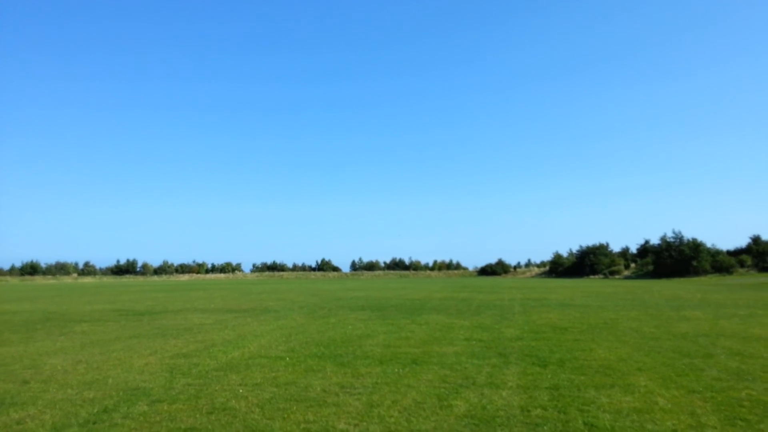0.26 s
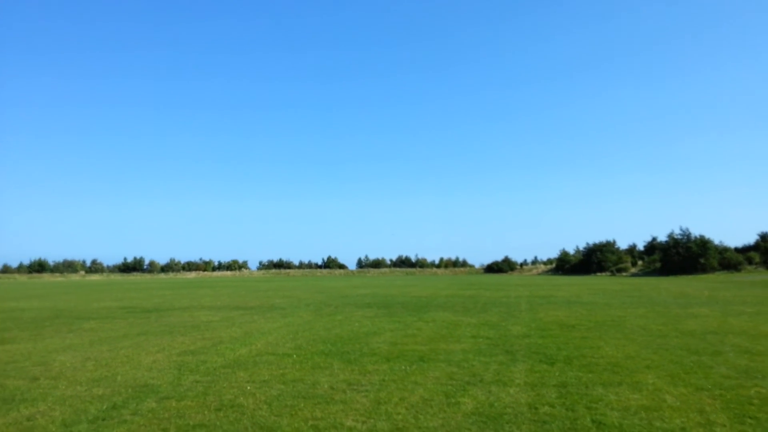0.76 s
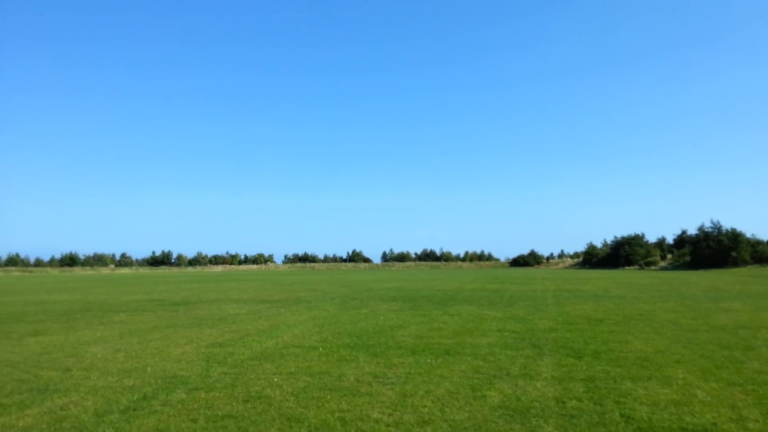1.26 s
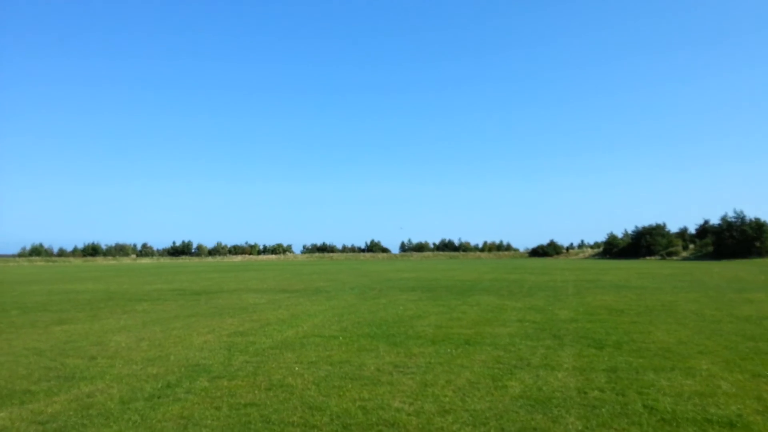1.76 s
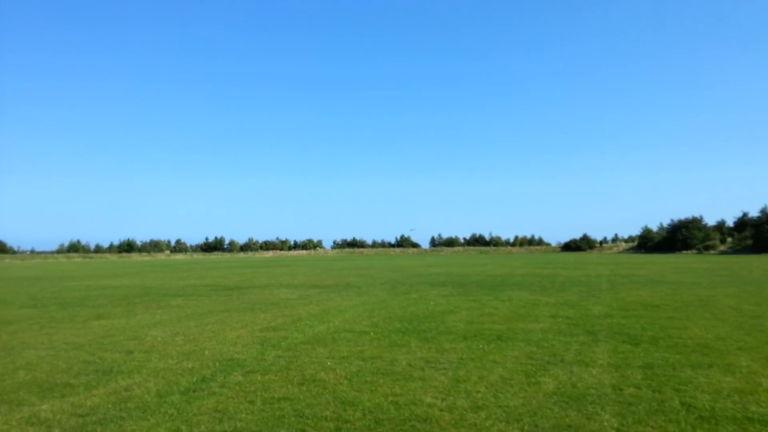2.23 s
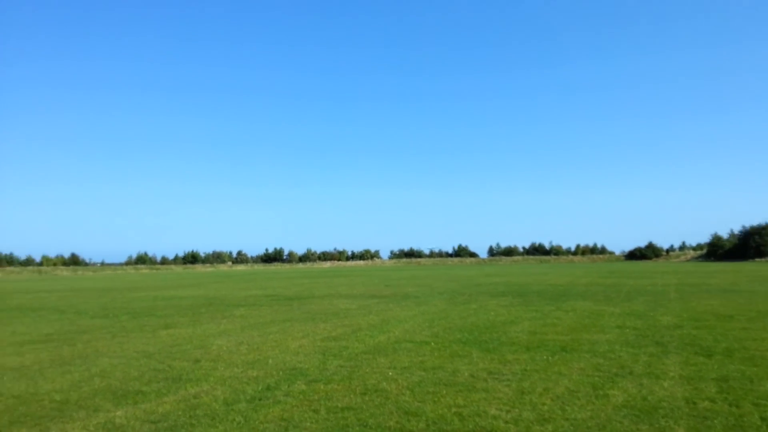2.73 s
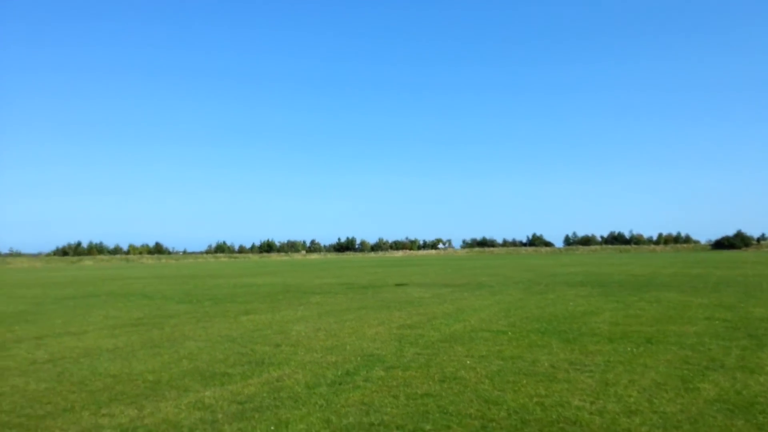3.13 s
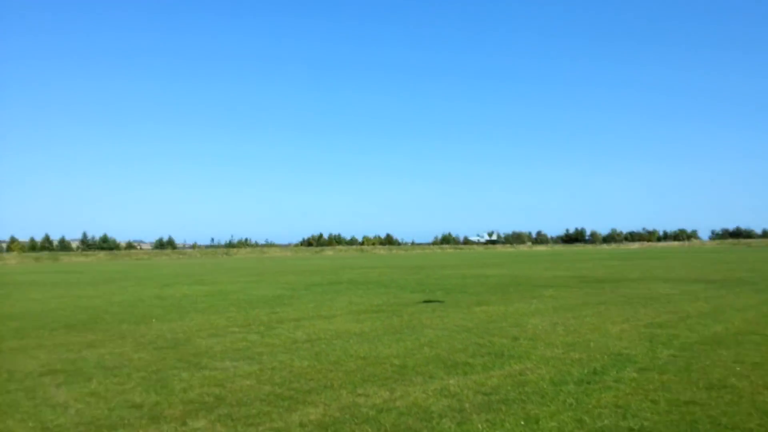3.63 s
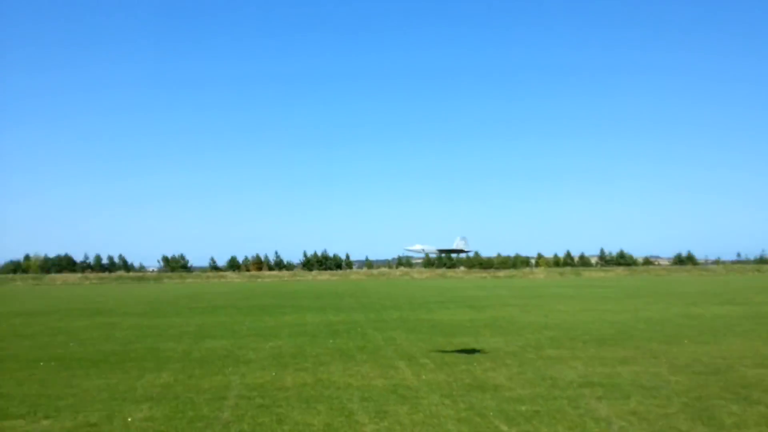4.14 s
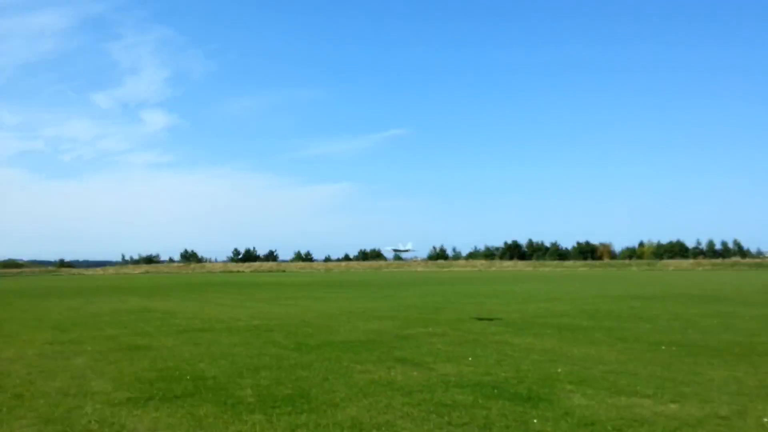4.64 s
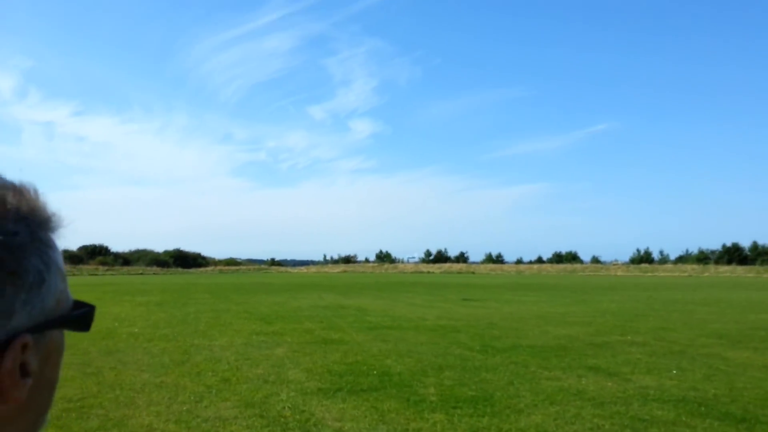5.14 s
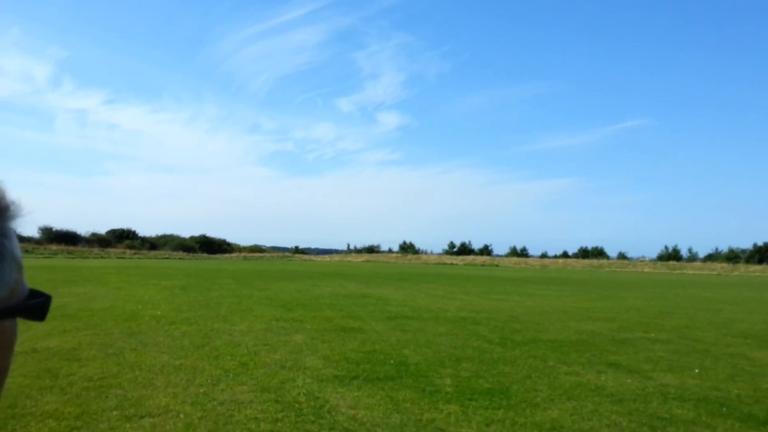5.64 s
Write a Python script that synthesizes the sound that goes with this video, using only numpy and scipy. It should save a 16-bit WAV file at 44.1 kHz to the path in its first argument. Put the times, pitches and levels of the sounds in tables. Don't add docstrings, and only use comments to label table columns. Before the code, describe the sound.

Wind buffets a small recorder as a model jet approaches with a shrill whine, sweeps close with a hissing roar, then recedes.

```python
import sys
import numpy as np
from scipy import signal
from scipy.fft import rfft, irfft, next_fast_len
from scipy.io import wavfile
from scipy.ndimage import uniform_filter1d

SR = 44100
rng = np.random.default_rng(int(sys.argv[2]) if len(sys.argv) > 2 else 0)


def invert_db(x):
    u = np.asarray(x, float) / 20
    return 10 ** u


def generate_wav(sig):
    pcm = np.round(np.clip(np.atleast_2d(sig).T, -1, 1) * 32767).astype(np.int16)
    wavfile.write(sys.argv[1], SR, pcm)


N = 259616

# (t/s, height/m, lead of the left port/us)
FLIGHT_PATH = [(0, 6.84, 17), (1.66, 4.32, 36), (2.2, 2.82, 29), (2.8, 2.27, 36), (3.2, 1.69, 35.5),
               (3.55, 1.6, 77.5), (3.93, 2.56, 114.5), (4.28, 3.36, 60), (4.6, 2.58, 30.5), (4.8, 2.36, 46),
               (5.0, 2.36, 53), (5.63, 2.19, -6), (5.89, 2.5, -29)]
SPEED_M_S, CLOSEST_M, CLOSEST_S, SOUND_M_S = 27.75, 17.5, 4.433, 343
BASS_CUT_HZ = 152


def evened(x):
    return x / np.sqrt(np.mean(x ** 2) + 1e-20)


def read(points, hz):
    f, value = np.transpose(points)
    return np.interp(np.log(hz + 1), np.log(f + 1), value)


def curves(rows, t):
    s, *columns = np.transpose(rows)
    return [np.interp(t, s, c) for c in columns]


def bumps(rows, t, half_s):
    s, *heights = np.transpose(rows)
    bells = np.exp(-.5 * ((t - s[:, None]) / half_s) ** 2)
    return np.array(heights) @ bells


def wander(shape, *spans):
    x = rng.standard_normal(shape)
    for axis, span in enumerate(spans):
        size = max(round(span), 1)
        for _ in range(2):
            x = uniform_filter1d(x, size, axis=axis)
    return evened(x)


def coloured(x, points):
    size = next_fast_len(x.shape[-1])
    gain = invert_db(read(points, np.fft.rfftfreq(size, 1 / SR)))
    return irfft(rfft(x, size) * evened(gain), size)[..., :x.shape[-1]]


def field():
    # (f/Hz, level/dB)
    floor_colour = [(25, -28), (60, -47), (120, -29), (300, -6), (900, -6), (2000, -13.5), (5000, -15),
                    (9000, -25), (15000, -22)]
    floor_db = -52
    noise = rng.standard_normal((3, N))
    return invert_db(floor_db) * coloured(noise[:2] + 0.38 * noise[2], floor_colour)


def eddies(gusts, slaps):
    gap_s, spread_db, gust_edge_s = .018, 3, 0.0087
    pop_hz, pop_hz_per_db, pop_spread = 498, 11.5, 0.12
    place, size, pitch = rng.standard_normal((int(N / SR / gap_s), 3)).T
    s = (np.arange(len(place)) + .5 + .3 * place) * gap_s
    s = np.clip(s, 0, N / SR - .01)
    start, length, usual_db = np.transpose(gusts)[:, :, None]
    outside = np.maximum(np.maximum(start - s, s - start - length), 0) / gust_edge_s
    db = (usual_db - 10 * outside).max(0) + spread_db * size
    slap_s, slap_db = np.transpose(slaps)
    s, db = np.r_[s, slap_s], np.r_[db, slap_db]
    pitch = np.r_[pitch, np.zeros(len(slaps))]
    hz = pop_hz + pop_hz_per_db * (np.maximum(db, -45) + 22)
    return np.transpose([s, db, hz * np.exp(pop_spread * pitch)])


def wind(pops, rustle_s):
    # (f/Hz, level/dB)
    rustle_colour = [(60, -93), (150, -21), (280, 1.5), (450, 3), (650, -4), (900, -12.5), (1400, -24.5),
                     (2500, -50)]
    pad = 2000
    t = np.arange(-pad, pad) / SR
    thumps, rustle_power = np.zeros((2, N + 2 * pad))
    for (s, db, hz), (turn, length) in zip(pops, rng.random((len(pops), 2))):
        shape = np.exp(-.5 * (t * hz / (.27 + .2 * length)) ** 2)
        part = slice(round(s * SR), round(s * SR) + 2 * pad)
        thumps[part] += invert_db(db - 3.35) * shape * np.cos(2 * np.pi * (hz * t + turn))
        rustle_shape = np.exp(-.5 * ((t + 0.0016) / rustle_s) ** 2)
        rustle_power[part] += invert_db(0.82 * db - 19.0) ** 2 * rustle_shape
    lumps = invert_db(4 * wander(len(thumps), 90))
    noise = rng.standard_normal(len(thumps))
    rustle = coloured(noise * np.sqrt(rustle_power) * lumps, rustle_colour)
    wind_filter = signal.butter(4, BASS_CUT_HZ, "high", fs=SR, output="sos")
    return signal.sosfilt(wind_filter, thumps + rustle)[pad:N + pad]


def flight(t):
    # (t/s, f/Hz)
    throttle = [(0, 3330), (.456, 3048), (1.856, 3251), (2.426, 3455), (2.528, 3604), (3.102, 3990),
                (3.65, 4155), (3.885, 4392), (4.13, 4345), (4.285, 4450), (4.405, 4585), (4.522, 4880),
                (4.831, 5194), (4.998, 5343), (5.101, 5576)]
    spool_s = .035
    along = SPEED_M_S * (t - CLOSEST_S)
    metres = np.hypot(along, CLOSEST_M)
    behind = along / metres
    s, settled_hz = np.transpose(throttle)
    u = np.maximum(t[:, None] - s[1:], 0) / spool_s
    fan_hz = settled_hz[0] + (1 - (1 + u) * np.exp(-u)) @ np.diff(settled_hz)
    heard_hz = fan_hz / (1 + SPEED_M_S / SOUND_M_S * behind)
    return metres, behind, fan_hz, heard_hz


def roar_levels(t):
    # (level at closest/dB, per throttle octave/dB, air loss per 100 m/dB, broadside dip/dB)
    layer_laws = [
        (-30, 7, -6.1, -1.5),
        (-38, 9.5, -3.8, 2.5),
        (-29, 3.5, -9.5, -20),
        (-37.5, 2.5, -10.5, -2),
    ]
    # (t/s, half length/s, duct level/dB, treble level/dB)
    swells = [(0.864, 0.23, 7, 5.5), (1.666, 0.073, 3, 4.5), (2.05, 0.22, -1.5, -4), (2.598, 0.13, -1, 1),
              (3.06, 0.088, -1, 5), (3.674, 0.13, 4, -1.5), (3.896, .08, -1, 4), (4.09, 0.066, 4.5, 1),
              (4.627, 0.091, -2.5, 2), (4.787, 0.16, -4, -0.5), (5.223, 0.11, 1, -1), (5.598, 0.05, 2, -5),
              (5.88, 0.11, -1, -5.5)]
    broadside, broadside_width = -0.069, 0.36
    cruise_hz = 4600
    metres, behind, fan_hz, _ = flight(t)
    side = np.exp(-.5 * ((behind - broadside) / broadside_width) ** 2)
    causes = [np.ones_like(t), np.log2(fan_hz / cruise_hz), (metres - CLOSEST_M) / 100, side]
    s, half_s, *heights = np.transpose(swells)
    duct_db, treble_db = bumps(np.transpose([s, *heights]), t, half_s[:, None])
    swell_db = [0.205 * treble_db, duct_db, treble_db, .9 * treble_db]
    return np.array(layer_laws) @ causes + swell_db - 20 * np.log10(metres / CLOSEST_M)


def roar():
    # (f/Hz, level/dB)
    exhaust = [(150, -25), (300, -41), (700, -3.5), (950, -12.5), (1500, -5), (2200, 2.4), (3000, -3.5),
               (4500, 3), (6000, -14.5), (9000, -48)]
    hiss = [(4000, -6), (5500, -0.3), (8000, 1), (10500, -1), (12000, -7.5), (15000, -5.5)]
    # (pitch/blade tones, level/dB)
    wash = [(.5, -32), (.75, -5), (.9, -2.5), (1.02, 0.3), (1.15, -9.5), (1.35, -12), (1.8, -25)]
    # (t/s, f/Hz)
    duct = [(0, 1280), (2.5, 1330), (3.7, 1250), (4.1, 1240), (4.5, 1130), (5, 1150), (5.89, 1245)]
    # (f/Hz, share of the direct sound)
    grass = [(600, .4), (1500, .7), (3000, .75), (5000, .6), (7000, .4), (10000, .2)]
    # (t/s, factor)
    aimed_down = [(0, .8), (1.8, .9), (3.1, 1.0), (3.5, .45), (4.15, .4), (4.55, .85), (5.89, .95)]
    # (t/s, delay/ms)
    body = [(1.9, 1.27), (2.4, 1.55), (4.3, 1.55), (4.5, 1.65)]
    # (f/Hz, likeness 0-1)
    likeness = [(500, 0.95), (2000, 0.91), (4500, 0.95), (8000, 0.52), (14000, 0.3)]
    duct_width_hz, ear_m, grass_turn, body_share = 72, 1.5, .9 * np.pi, 0.14

    frames, hz = N // 256 + 5, np.fft.rfftfreq(1024, 1 / SR)[:, None]
    t = np.arange(frames) * 256 / SR
    metres, _, _, blade_hz = flight(t)
    height_m, lead_us = curves(FLIGHT_PATH, t)

    howl = np.exp(-.25 * ((hz - curves(duct, t)[0]) / duct_width_hz) ** 2)
    wash_gain = invert_db(read(wash, hz / blade_hz))
    layers = [invert_db(read(exhaust, hz)), howl, wash_gain, invert_db(read(hiss, hz))]
    power = 0
    for gain, db in zip(layers, roar_levels(t)):
        power = power + gain ** 2 / (gain ** 2).sum(0) * invert_db(db) ** 2
    power = power * hz ** 6 / (hz ** 6 + BASS_CUT_HZ ** 6)

    echo_ms = 2000 * height_m * ear_m / metres / SOUND_M_S
    echo = np.clip(read(grass, hz), 0, 1) * curves(aimed_down, t)[0]
    echo = echo * (1 - howl)
    comb = abs(1 + echo * np.exp(1j * (2 * np.pi * hz * echo_ms / 1000 + grass_turn)))
    body_delay = np.exp(2j * np.pi * hz * curves(body, t)[0] / 1000)
    comb *= abs(1 - body_share * (1 - howl) * body_delay / (1 + (hz / 5000) ** 4))

    air_db = 1.13 * wander((frames, len(hz)), 6, 14).T + 0.37 * wander(frames, 5)
    a, b, c, d = rng.standard_normal((frames, len(hz), 4)).T
    same = np.clip(read(likeness, hz), -1, 1)
    left = a + 1j * b
    lag = np.exp(-2j * np.pi * hz * lead_us / 1e6)
    right = same * left * lag + np.sqrt(1 - same ** 2) * (c + 1j * d)
    z = np.array([left, right]) * np.sqrt(power / (1 + echo ** 2)) * comb * invert_db(air_db)
    return signal.istft(z, nperseg=1024, noverlap=768)[1][:, :N]


def whine():
    # (t/s, level at closest distance/dB, left-right/dB, 2nd harmonic relative to it/dB)
    tone = [(0, -33, 2, -19.5), (.36, -30, -2.5, -20), (.7, -37, -6, -27), (.95, -33.5, -11, -24),
            (1.2, -34.5, -5, -40), (1.68, -32.5, -7, -23), (1.86, -34.5, -4, -26), (1.96, -24.5, -1.2, -28),
            (2.3, -25, -1.2, -27.5), (2.51, -23.5, -3.5, -12), (2.72, -30.5, -4, -19),
            (3.05, -29.5, -9.5, -16), (3.33, -24.5, 1.5, -5.5), (3.5, -39, -2, -6), (4.3, -35, 0, -17),
            (4.7, -41, -4.5, -7.5), (5.1, -41.5, -0.5, -7), (5.89, -31.5, 4, -13.5)]
    # (t/s, left/dB, right/dB)
    glints = [(3.11, -5, -0.5), (3.15, 8.5, -2), (3.2, -3, -4.5), (3.58, 11, 12.5), (3.79, 5, 4),
              (3.87, 13.5, 11.5), (3.92, -3, 6), (4.0, -6, -4), (4.08, 1.5, -1), (4.14, 3, -1.5),
              (4.195, 14, 14), (4.228, -7.5, -7), (4.285, 8, 9), (4.33, 2, 0), (4.37, 14.5, 13.5),
              (4.425, 4, -1), (4.47, 9.5, 5.5), (4.54, 14, 10.5), (4.6, 0, 4), (4.645, -4, -1),
              (4.69, 11, 3.5), (4.82, 8, 7.5), (4.92, 5, 2), (4.98, 8, 11), (5.06, -5, -9),
              (5.12, 10.5, -7), (5.19, -5, -4), (5.31, 3, 13.5), (5.39, 8, 8), (5.55, 1, -14), (5.68, 4, 5),
              (5.78, -8, 2)]
    # (t/s, level/dB)
    third = [(0, -95), (2.8, -76), (3.0, -62), (3.38, -53), (3.7, -61), (4.0, -62), (4.55, -58), (4.8, -59),
             (4.95, -66)]
    # (t/s, level/dB)
    shaft = [(0, -90), (4.15, -107), (4.3, -50.5), (4.7, -55), (4.8, -76), (5.1, -90), (5.2, -56.5),
             (5.89, -62)]
    # (t/s, f/Hz, level/dB)
    beat = [(2.569, 1500, -60), (2.594, 1759, -54), (2.654, 1667, -52), (2.773, 1655, -54.5),
            (3.116, 1630, -50.5), (3.138, 1493, -57), (3.17, 1480, -72)]
    blades, glint_s, second_glint = 10, 0.029, 0.64

    t = np.arange(N) / SR
    metres, _, _, blade_hz = flight(t)
    shake = np.interp(t, [2.8, 3.4, 4.6, 5.1, 5.3], [.4, 1, 1.1, 1.7, .9])
    hz = blade_hz * (1 + 0.00159 * shake * wander(N, 160))
    lead_s = curves(FLIGHT_PATH, t)[1] / 1e6
    phase = 2 * np.pi * (np.cumsum(hz) / SR + np.array([[.5], [-.5]]) * hz * lead_s)

    tone_db, pan_db, below_db = curves(tone, t)
    tone_db = tone_db - 20 * np.log10(metres / CLOSEST_M)
    glint_db = bumps(glints, t, glint_s)
    first_db = tone_db + np.array([pan_db / 2, -pan_db / 2]) + glint_db
    second_db = tone_db + below_db + second_glint * glint_db.mean(0)
    flutter_db = 2.3 * shake * wander(N * 6, 380).reshape(-1, 2, N)
    out = invert_db(first_db + flutter_db[0]) * np.sin(phase)
    out += invert_db(second_db + flutter_db[1]) * np.sin(2 * phase)
    out += invert_db(curves(third, t)[0] + flutter_db[2]) * np.sin(3 * phase)
    out += invert_db(curves(shaft, t)[0]) * np.sin(phase / blades)

    beat_hz, beat_db = curves(beat, t)
    beat_on = np.clip(np.minimum(t - beat[0][0], beat[-1][0] - t) / 0.022, 0, 1)
    out += beat_on * invert_db(beat_db) * np.sin(2 * np.pi * np.cumsum(beat_hz) / SR)
    return np.sqrt(2) * out


def scene():
    # (start/s, length/s, usual pop level/dB)
    gusts_left = [(0, 0.077, -30), (.16, 0.3, -26.5), (.51, 0.23, -27), (.74, .16, -24), (.9, .11, -27),
                  (1.02, .33, -21.5), (1.38, .1, -26.5), (1.52, 0.036, -37), (1.63, 0.042, -35.5),
                  (1.8, 0.034, -41), (2.0, 0.032, -33), (2.09, 0.033, -37.5), (2.18, .13, -24.5),
                  (2.42, .03, -33), (2.49, 0.067, -28.5), (2.65, 0.23, -28.5), (2.96, 0.091, -27.5),
                  (4.02, 0.088, -26.5), (4.26, 0.053, -27.5), (4.43, 0.22, -32.5), (4.7, 0.29, -30.5),
                  (5.6, 0.33, -47)]
    gusts_right = [(.63, 0.045, -48), (1.32, .1, -46), (1.5, 0.079, -35), (1.76, 0.038, -33),
                   (1.95, .13, -33), (2.47, .05, -31.5), (2.88, .17, -32.5), (3.96, .06, -28),
                   (4.18, 0.13, -24.5), (4.36, 0.087, -31.5)]
    # (t/s, peak level/dB)
    slaps_left = [(.016, -15), (.063, -8.5), (.084, -5.5), (0.179, -23), (.204, -15), (0.282, -15.5),
                  (.419, -21), (.523, -22), (.577, -25), (.597, -27), (.611, -19.5), (.696, -19.5),
                  (.868, -23), (1.065, -18), (1.16, -17.5), (1.288, -10), (1.326, -18), (1.407, -8),
                  (2.195, -20), (2.294, -15), (2.675, -15), (2.814, -17.5), (2.842, -18), (4.456, -17.5),
                  (4.797, -19), (4.897, -25)]
    slaps_right = [(.119, -15), (0.144, -19), (.692, -18.5), (1.115, -15), (1.331, -24), (1.404, -24),
                   (1.556, -16.5), (1.672, -19), (1.884, -12.5), (2.035, -20.5), (2.317, -27),
                   (2.96, -17.5), (3.018, -19.5), (3.14, -34), (3.975, -20), (4.0, -22), (4.196, -23),
                   (4.397, -24.5)]
    left = wind(eddies(gusts_left, slaps_left), 0.0075)
    right = wind(eddies(gusts_right, slaps_right), 0.0034)
    return field() + np.array([left, right]) + roar() + whine()


def band_limit(x):
    return signal.sosfilt(signal.butter(12, 15240, fs=SR, output="sos"), x)


def record(dry):
    # (t/s, share 0-1)
    top_kept = [(0, .97), (2.3, .85), (2.7, .55), (3.1, .6), (3.5, .8), (3.9, .85), (4.15, .55), (4.8, .5),
                (5.1, .08), (5.45, .04), (5.7, .33)]
    edge_hz = 14600
    calm_db, mask_db = -30.5, -37
    hz, t, z = signal.stft(dry, SR, "cosine", nperseg=2048)
    band, block = (hz // 260).astype(int), np.arange(len(t)) // 2
    luck = rng.random((block.max() + 1, band.max() + 1))[block][:, band].T
    kept = (luck < curves(top_kept, t)[0]) | (hz < 11100)[:, None]
    kept |= abs(hz[:, None] - 3 * flight(t)[3]) < 110
    below = np.cumsum(abs(z) ** 2, 1)
    jet = (abs(z[:, hz > 1500]) ** 2).sum(1, keepdims=True)
    bass = below[:, hz < 350][:, -1:].sum(0)
    calm = bass < invert_db(2 * calm_db) * uniform_filter1d(jet.sum(0), 5)
    kept = kept & (below > invert_db(2 * mask_db) * jet * calm)
    kept = kept & (hz < edge_hz)[:, None]
    mix = signal.istft(z * kept, SR, "cosine", nperseg=2048)[1][:, :N]
    return band_limit(mix)


dry = scene()
out = record(dry)
generate_wav(out)
```